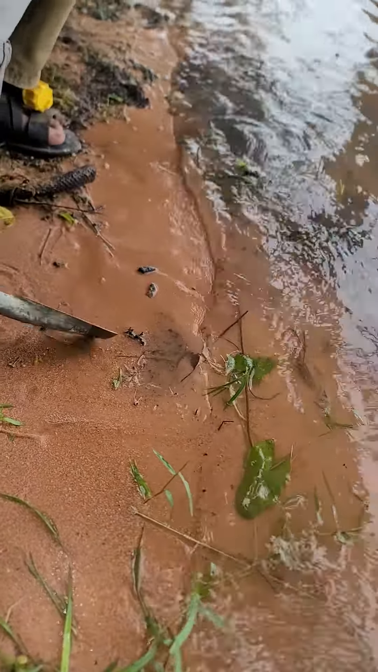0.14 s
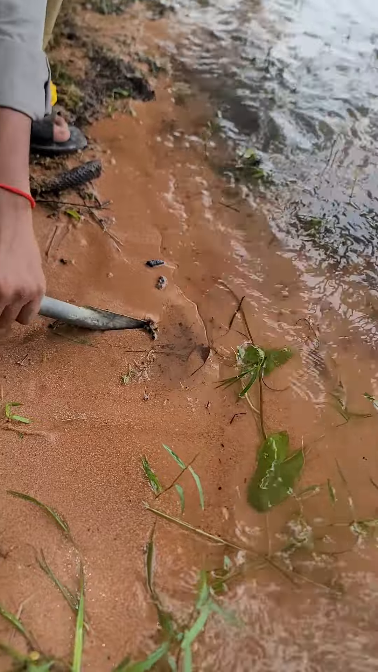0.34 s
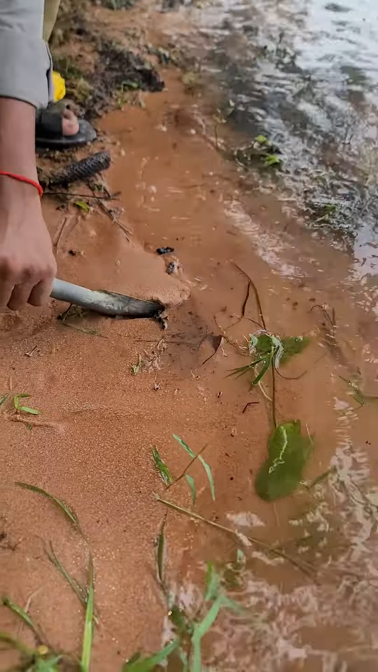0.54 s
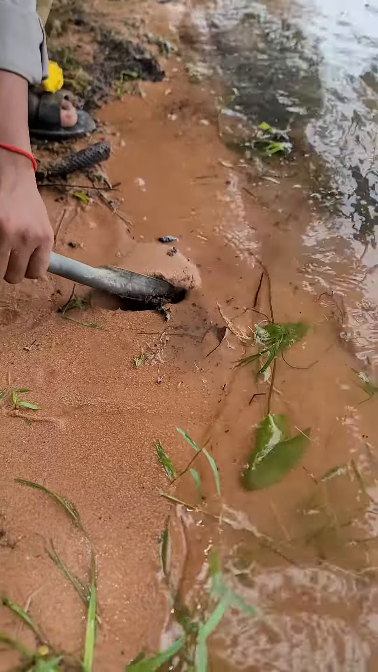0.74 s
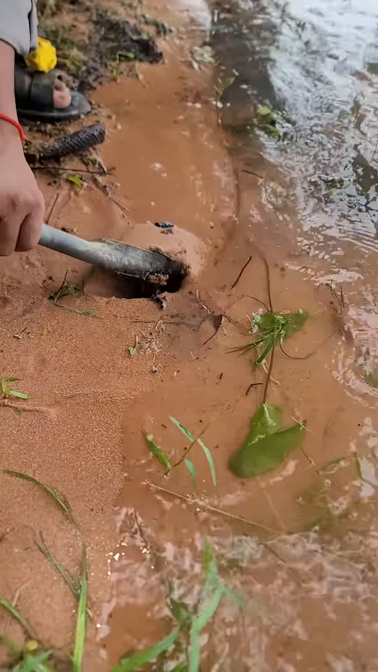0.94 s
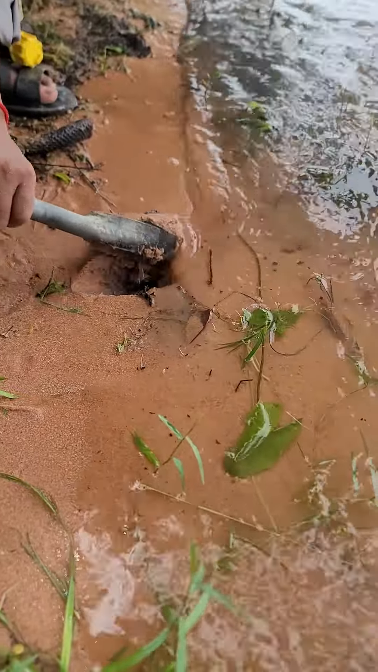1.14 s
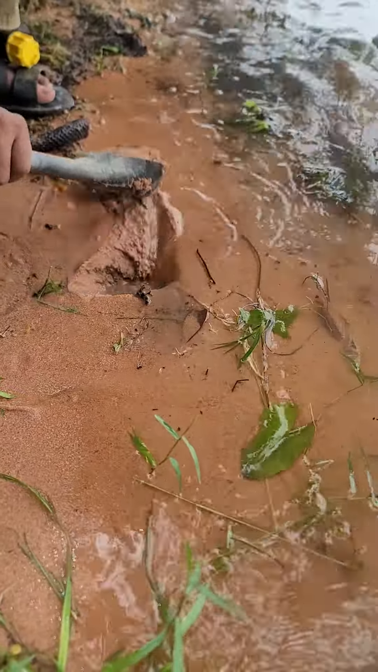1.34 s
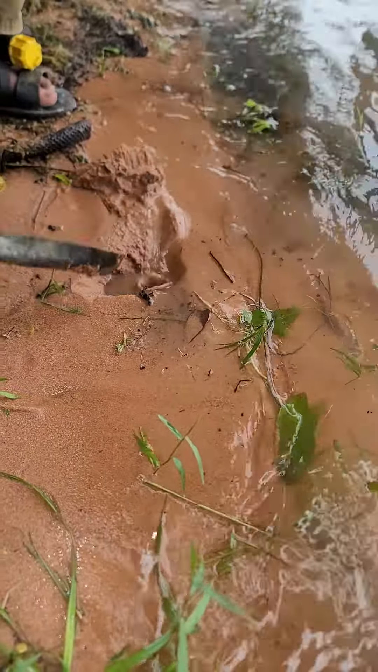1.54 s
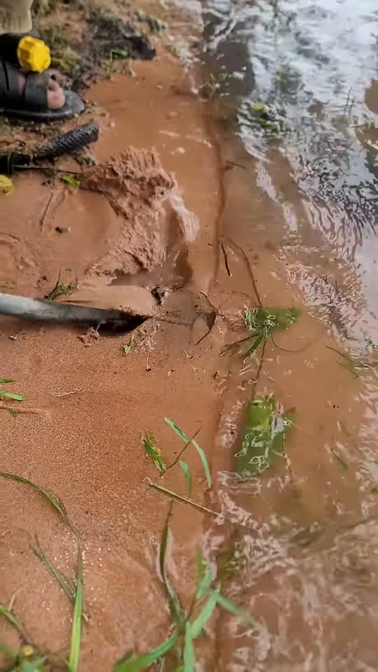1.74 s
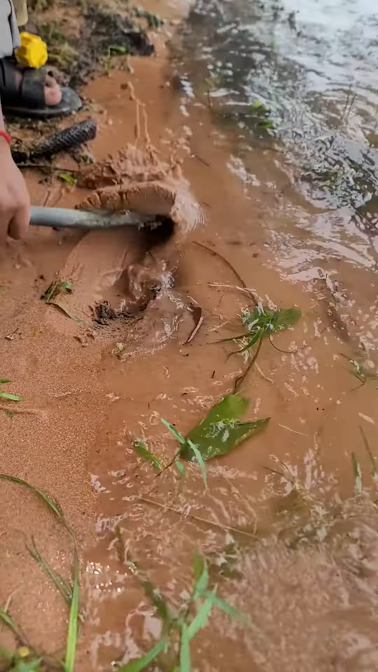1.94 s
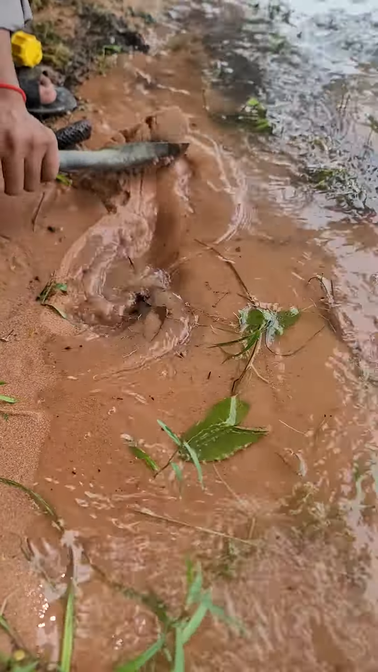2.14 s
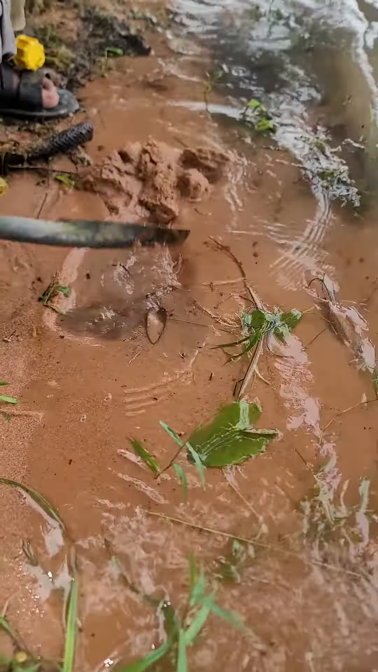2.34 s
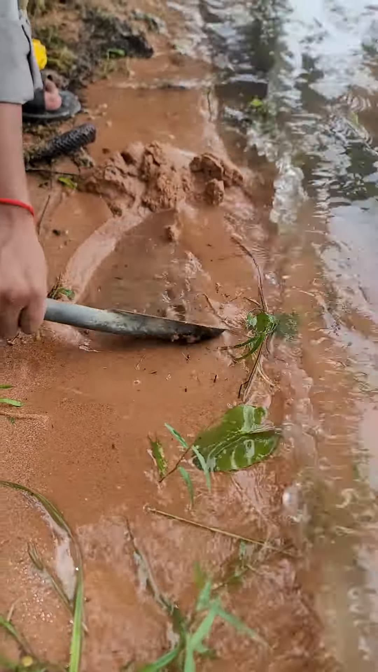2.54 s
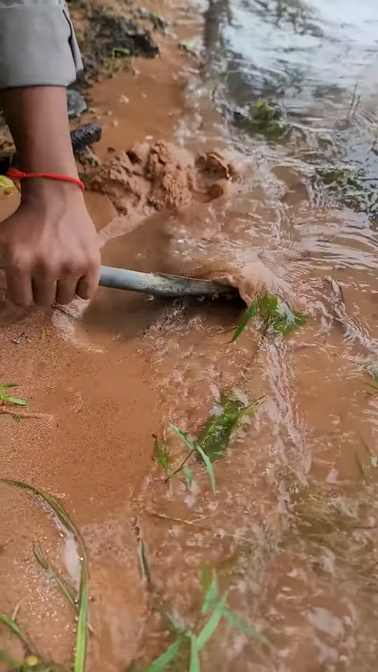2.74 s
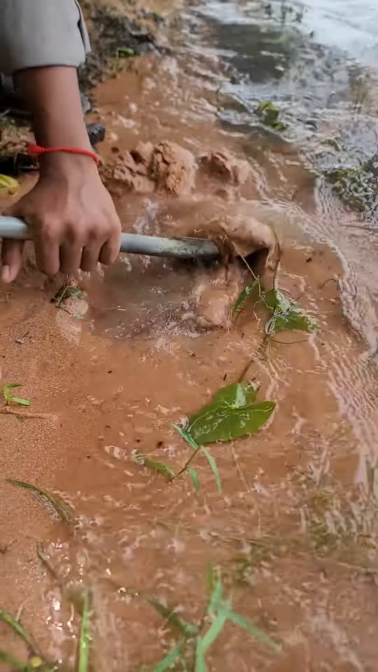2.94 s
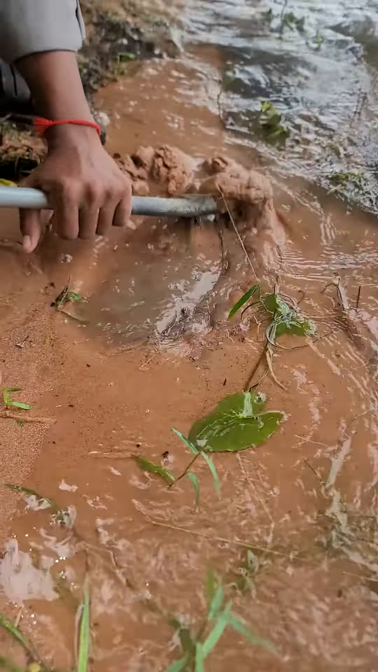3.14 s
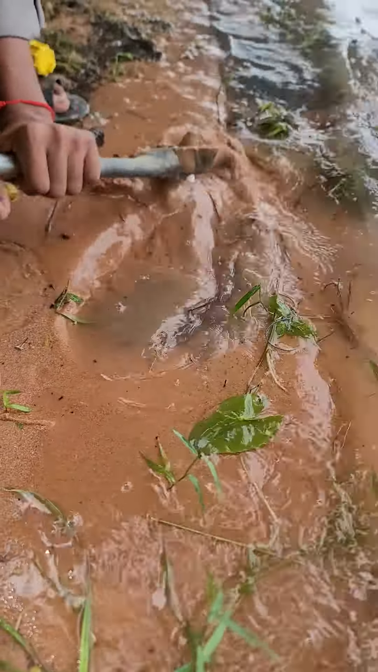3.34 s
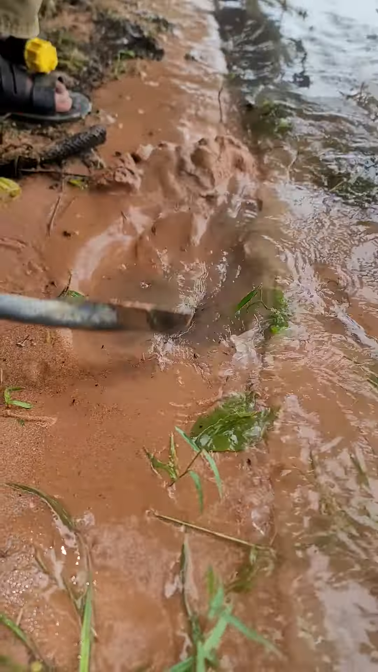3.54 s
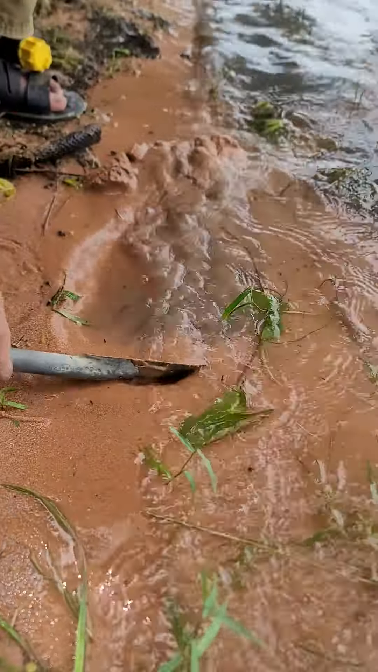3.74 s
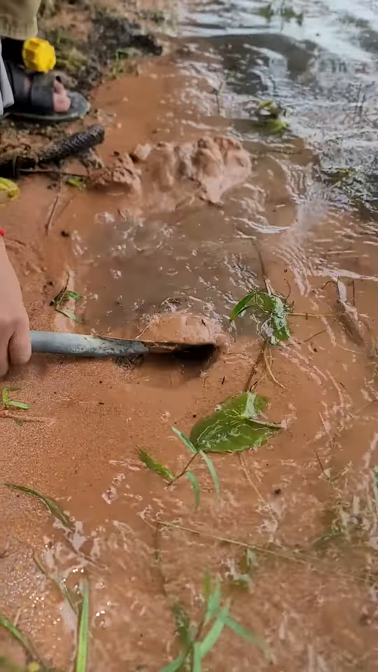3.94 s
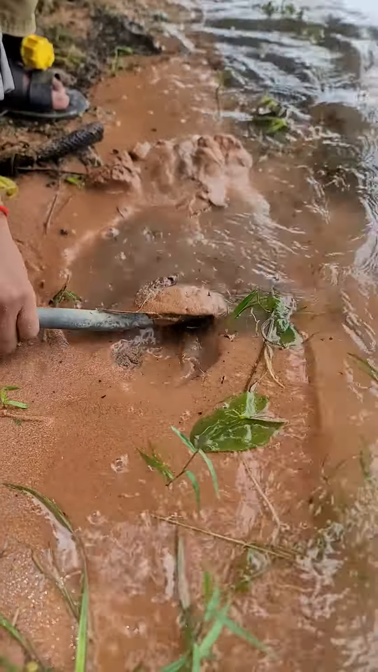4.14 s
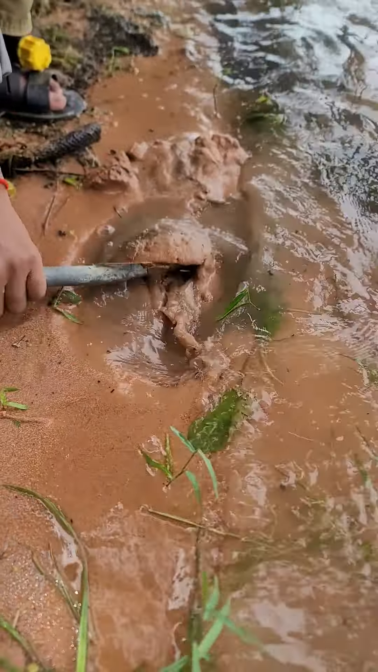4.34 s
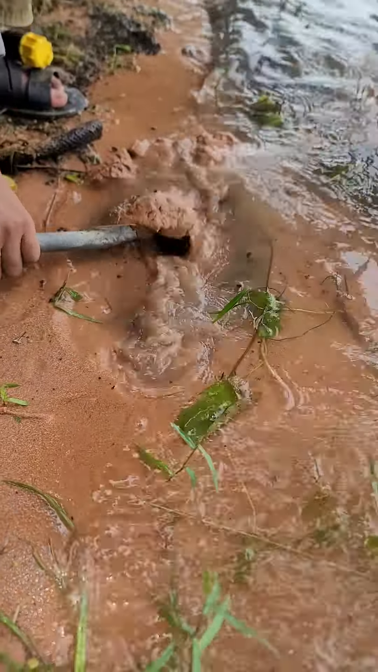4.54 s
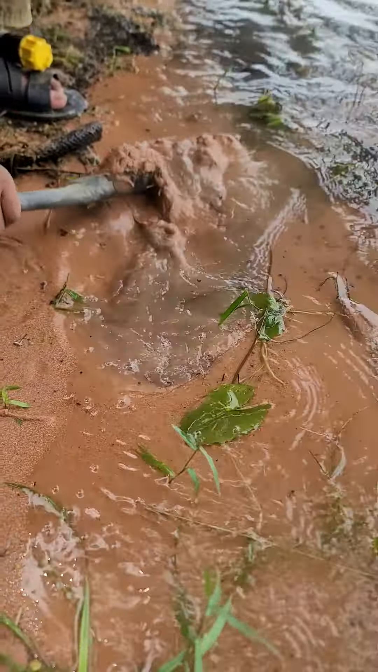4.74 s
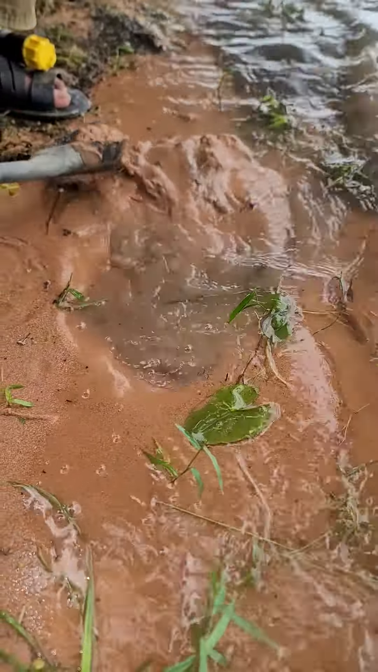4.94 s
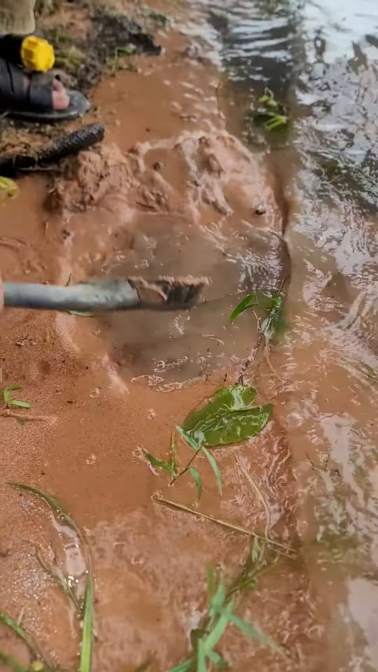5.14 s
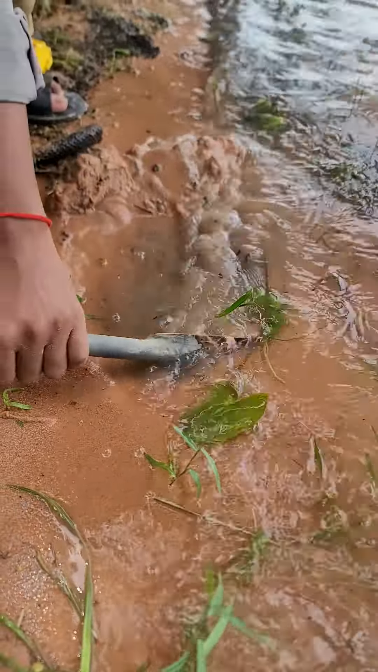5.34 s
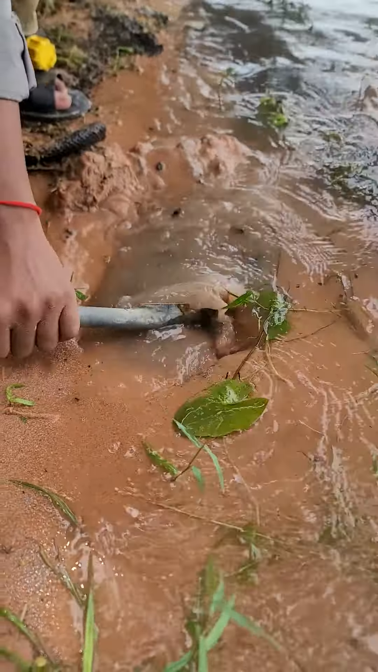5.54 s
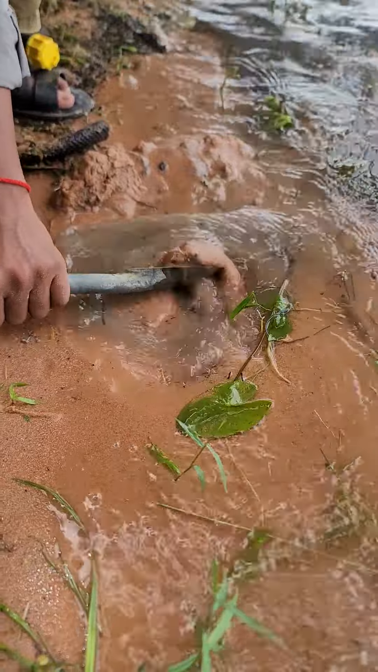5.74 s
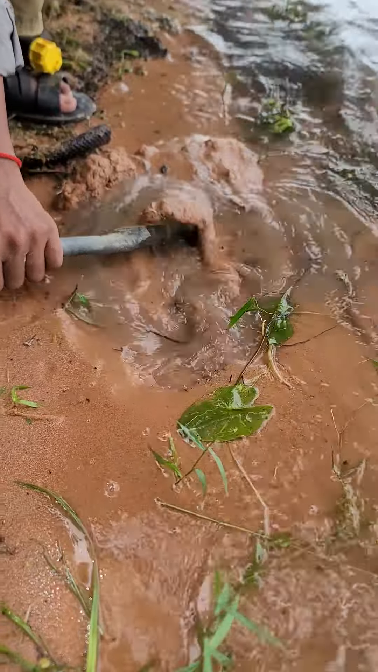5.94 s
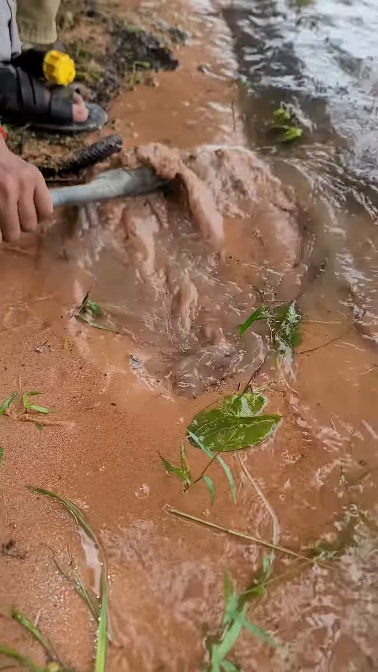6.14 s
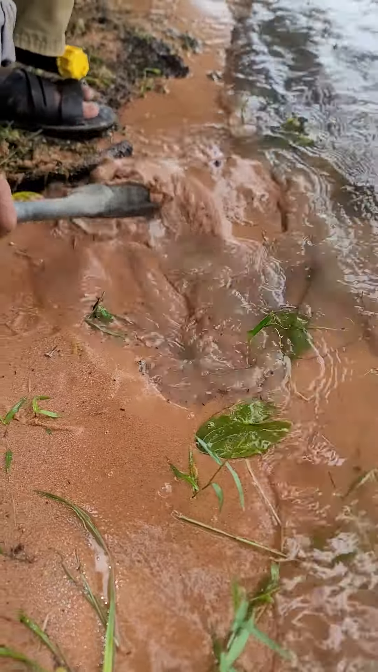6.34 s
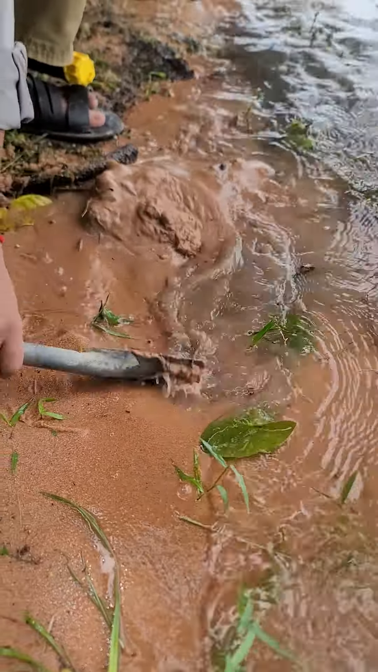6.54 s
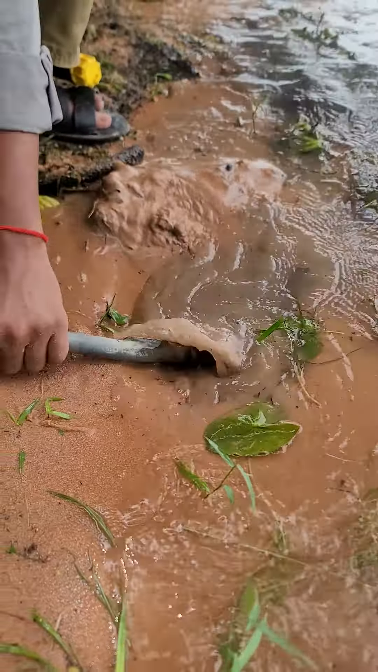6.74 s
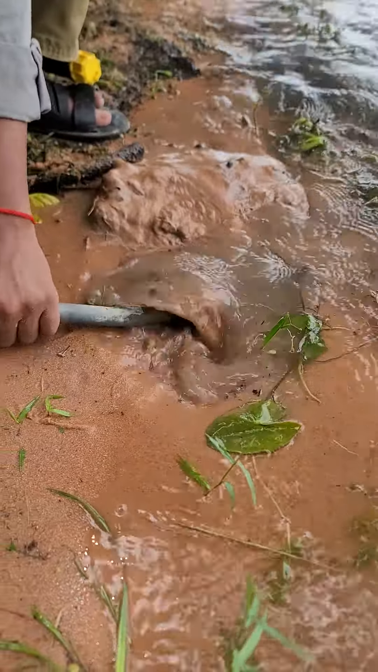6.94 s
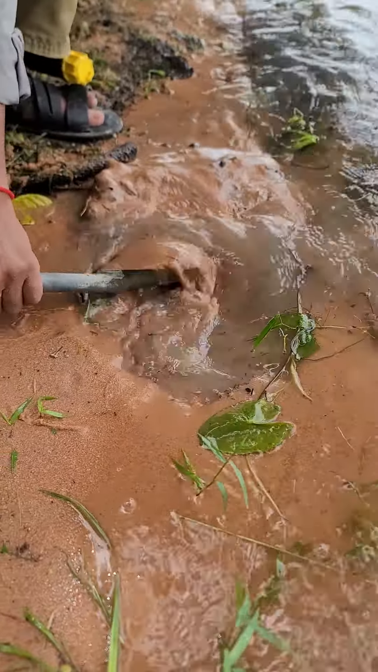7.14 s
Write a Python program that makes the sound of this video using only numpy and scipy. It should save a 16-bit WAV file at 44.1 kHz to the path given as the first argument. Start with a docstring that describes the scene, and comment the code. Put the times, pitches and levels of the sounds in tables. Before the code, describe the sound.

Close stereo, outdoors at a muddy water's edge: a metal pipe pushes through wet sand with gritty, stuttering rasps, soft slops and crackling bubbles. Drops and pebbles tick. A far engine drones under airy hiss, and a distant bird gives short falling whistles early on and again late. The digging is busiest in the middle, eases before five seconds, then resumes to the end.

```python
"""At a muddy water's edge, close to a two-port microphone, a metal pipe is pushed through wet sand.
From the start an engine drones far off, over rumble and open-air hiss, and grains rasp on the steel.
Distant falling whistles of a bird come in the first seconds, among ticking drops and ringing bubbles.
Bubbles and pushes crowd the middle, then ease to a quieter stretch between about 4.5 and 5 s.
The bird, built from gliding sines, returns near 5.5 s; more pushes, bubbles and gurgles close the scene."""
import sys
import numpy as np
from scipy import signal
from scipy.fft import rfft, irfft, next_fast_len
from scipy.io import wavfile
from scipy.ndimage import uniform_filter1d

SR = 44100
rng = np.random.default_rng(int(sys.argv[2]) if len(sys.argv) > 2 else 0)


def to_wav(s):
    """Save 16-bit WAV."""
    ch = np.atleast_2d(s).T  # columns
    pcm = np.round(np.clip(ch, -1, 1) * 32767)  # PCM
    wavfile.write(sys.argv[1], SR, pcm.astype(np.int16))


N = 317079  # samples

# Spectra: frequency_hz, relative level_db per Hz. Each layer is evened to rms 1 afterwards.
# Far rumble below the engine drone
RUMBLE_SPECTRUM = [(15, -60), (30, -21), (45, -13), (65, 9), (90, 1), (140, 1.5), (250, -11.5), (420, -10),
                   (640, -23), (950, -52)]
# Hiss of the open air
AIR_SPECTRUM = [(300, -5), (480, -18), (575, 22.5), (700, 8), (1000, -1), (1550, 17.5), (2300, 3.5),
                (3600, -8.5), (4700, 6.5), (7600, -6.5), (11000, -12), (16500, -16)]
# Sand rasping on steel
RASP_SPECTRUM = [(700, -58), (1200, -27), (1860, -3.5), (2250, -7.5), (3060, 7.5), (4300, 7.5),
                 (5600, -10.5), (7000, -19), (9000, -58)]
# Slurry slopping
SLOP_SPECTRUM = [(150, -59), (350, -12), (600, 3.5), (950, -15), (1400, 6), (2000, -4.5), (3500, -89)]
# Fine bright grit
GRIT_SPECTRUM = [(2000, -10.5), (4000, 6.5), (7100, 5.5), (7700, -10.5), (8500, 1), (12500, -0.5),
                 (16500, -5)]

# Distant engine: order (multiple of the turning rate), mean level_db (rms, before its waver)
ENGINE_ORDERS = [(2, -64), (3, -51.5), (4, -61), (5, -64), (6, -54), (9, -69), (10, -67.5), (15, -70)]
# Distant bird whistles: start_s, length_s, level_db (before waver and echoes), starting pitch_hz
BIRD_WHISTLES = [(0.555, 0.072, -48.5, 1530), (0.764, 0.068, -47, 1530), (0.862, 0.029, -47, 1547),
                 (1.221, 0.031, -43, 1546), (1.273, 0.1, -48, 1582), (5.495, 0.068, -47, 1535),
                 (5.705, 0.031, -44, 1536), (6.158, 0.027, -43, 1524), (6.215, 0.03, -44.5, 1488),
                 (6.26, 0.055, -49, 1525)]
# Specks of spray that land as thin high ticks: start_s, peak level_db
SPRAY_SPECKS = [(0.0912, -41), (0.7277, -32), (0.8265, -39), (1.042, -34), (1.0725, -33), (2.3386, -41),
                (2.38, -47), (3.5354, -33), (4.0607, -34), (5.0065, -45), (5.0534, -45), (5.1614, -48),
                (5.1886, -45)]
# Ticks of drops and pebbles: start_s, level_db (before halving), knock level_db re the snap
DROP_TICKS = [(0.171, -33.5, -16), (0.326, -19.5, -5), (0.772, -29, -18), (1.1407, -26, -19),
              (1.2085, -37, 2), (1.6023, -39, -19), (1.759, -22, -7), (1.985, -35.5, -26),
              (2.4815, -32, -16), (2.996, -38.5, 10.5), (3.487, -27.5, -28), (3.585, -23, -30),
              (3.997, -50, 28), (4.034, -45, 19.5), (4.136, -18, -22), (4.196, -40, 7), (4.23, -32, -3),
              (4.711, -37, -19), (5.4022, -34.5, -1), (5.573, -33, -24), (5.617, -22.5, -26),
              (5.6473, -20, -19), (6.583, -30, 4), (6.619, -21, -7), (6.696, -53, 27), (6.9498, -23.5, -13)]
# Hollows in the mud that open or close: start_s, length_s, level_db (before shake and side), from_hz, to_hz
MUD_GURGLES = [(0.251, 0.073, -41, 2250, 1340), (0.33, .045, -29.5, 1340, 1158),
               (2.52, .075, -38, 611, 694), (2.553, 0.035, -33.5, 936, 970),
               (1.692, 0.055, -31, 2250, 1426), (6.892, .028, -42, 740, 1210),
               (6.913, .036, -37.5, 930, 1003), (6.947, .028, -43, 1326, 1000),
               (7.13, 0.027, -36.5, 2600, 3370), (7.14, 0.021, -38, 890, 1036)]
# Bubbles: start_s, level_db (before wobble), nominal pitch_hz, t60_s, left-minus-right balance_db
BUBBLE_RINGS = [(0.029, -31.5, 1760, 0.03, -4), (0.329, -21, 1460, 0.025, -3),
                (1.14, -35.5, 2770, 0.053, 9), (1.208, -27, 1074, 0.028, 2), (1.533, -41, 1350, 0.043, 1),
                (2.086, -35.5, 2540, 0.039, 5), (2.104, -39.5, 1270, 0.034, 5),
                (2.4, -32, 1810, 0.034, 5.5), (2.453, -24.5, 3130, 0.036, 6), (2.452, -33, 1066, 0.07, 4),
                (2.548, -27, 2510, 0.027, 1), (2.821, -39.5, 970, 0.04, -4), (2.479, -30.5, 2750, 0.036, 5),
                (2.62, -33, 2110, 0.055, 4), (2.507, -37, 945, 0.049, 2), (2.517, -31, 3180, 0.028, 3),
                (2.606, -33, 980, 0.05, 2), (3.208, -35, 1060, 0.028, 6), (3.314, -35.5, 996, 0.042, 11),
                (3.357, -34.5, 5340, 0.026, 8), (3.428, -20, 1780, 0.033, -9),
                (3.444, -30, 3220, 0.011, -3), (3.468, -33, 790, 0.092, 8), (3.521, -33, 776, 0.11, 8.5),
                (3.541, -31, 1380, 0.043, 10.5), (3.595, -23.5, 910, 0.058, 0),
                (3.874, -38, 1443, 0.11, -1), (4.183, -26, 1900, 0.041, -4.5),
                (4.215, -26.5, 1270, 0.029, -7.5), (4.293, -38, 1090, 0.069, -7),
                (4.319, -25.5, 1886, 0.041, 5), (4.342, -38, 1165, 0.031, 8), (4.456, -41, 960, 0.048, 5),
                (5.106, -43, 1410, 0.059, 7), (5.115, -35, 765, 0.091, 7), (5.165, -44, 480, 0.21, 3),
                (5.18, -24.5, 1430, 0.015, -3), (5.216, -20, 1008, 0.031, 2), (5.573, -29, 2630, 0.033, 2),
                (5.616, -23.5, 3100, 0.025, 2), (5.64, -29, 2920, 0.028, -1), (6.529, -22, 2740, 0.018, 2),
                (6.54, -24, 1770, 0.015, -2), (6.624, -21.5, 2810, 0.019, 6),
                (6.584, 4.5, 466, 0.0046, 3.5), (6.603, -27.5, 444, 0.076, 2),
                (6.616, -21.5, 834, 0.022, 10.5), (6.797, -35, 360, 0.13, -2),
                (6.809, -37.5, 3150, 0.02, -8), (6.951, -19, 1160, 0.018, 11.5), (6.985, -34, 620, 0.03, 6),
                (6.986, -33, 2980, 0.019, 5), (7.108, -41, 3310, 0.065, -9.5)]
# Resonances of the pipe: frequency_hz, width_hz (in the rasp), lift_db (in the rasp)
PIPE_MODES = [(1298, 82, 26), (1814, 146, 19.5), (2500, 240, 16.5), (3014, 92, 5.5), (6310, 170, 21.5)]
# Pushes of the pipe: full_force_s, hold_s, force_db, rise_s, fall_s, wetness_db and grittiness_db re the
# force; rise and fall are the times for 20 dB
PIPE_PUSHES = [(0.275, 0.041, -44.5, 0.11, 0.059, -22, -5),
               (0.314, 0.035, -36.5, 0.012, 0.035, -10.5, -13.5),
               (0.783, 0.024, -58.5, 0.26, 0.39, -13, -10), (1.086, 0.06, -51, 0.095, 0.018, -25, -13.5),
               (1.597, 0.0072, -49.5, 0.0077, 0.33, -41, -5.5),
               (1.692, 0.0055, -34, 0.039, 0.079, -17, -9.5), (1.789, 0.077, -45, 0.14, 0.072, -4, -7.5),
               (2.116, 0.0092, -57, 0.18, 0.092, -21, -7), (2.495, 0.092, -44, 0.049, 0.32, -5.5, -9.5),
               (2.716, 0.08, -49, 0.7, 0.38, -5.5, -10), (2.935, 0.11, -60.5, 0.091, 0.26, 1, -0.5),
               (3.324, 0.039, -61.5, 0.33, 0.019, -11, -6), (3.48, 0.0081, -52, 0.095, 0.28, 0.5, -15),
               (3.564, 0.01, -53.5, 0.0066, 0.14, -14, -1), (3.645, 0.034, -39, 0.037, 0.08, -11.5, -9),
               (3.874, 0.13, -50, 0.16, 0.01, -10.5, -15), (4.257, 0.015, -39.5, 0.09, 0.013, -3.5, -20),
               (4.289, 0.044, -51.5, 0.053, 0.15, -4.5, -9), (4.435, 0.13, -66, 0.082, 0.33, 3.5, -3.5),
               (4.868, 0.042, -73.5, 0.024, 0.069, -13, 6), (5.186, 0.1, -47, 0.024, 0.029, -17, -11),
               (5.333, 0.0056, -51.5, 0.014, 0.021, -24, -17.5),
               (5.396, 0.15, -57.5, 0.048, 0.075, -9, -12.5), (5.611, 0.012, -45, 0.022, 0.15, -32, -18),
               (5.801, 0.0081, -49.5, 0.055, 0.097, -5.5, -14),
               (5.865, 0.078, -65.5, 0.057, 0.11, -2.5, -2), (6.219, .01, -50, 0.013, 0.15, -27, -20.5),
               (6.509, 0.1, -42.5, 0.0068, 0.21, -14.5, -15.5), (6.793, 0.2, -57, 0.16, 0.1, 0.5, -18.5),
               (6.956, 0.0027, -41.5, 0.048, 0.0077, -6.5, -14.5),
               (7.141, 0.0045, -54, 0.16, 0.073, 1, -13)]
# Least force while the pipe only drags between pushes: level_db of rasp, slop and grit
DRAG_DB = (-72, -71.5, -81)
# Microphone ports: frequency_hz, lead_rad of the left port
PORT_PHASE = [(0, 0), (190, .25), (350, 1.5), (780, 1.9), (3400, 1.6), (14000, 28), (22050, 44)]
# Microphone colour: frequency_hz, left-minus-right balance_db
PORT_BALANCE = [(60, -0.4), (250, -2), (650, 1), (5000, -0.5), (12000, 2.5)]

ENGINE_HZ = 23.83  # mean turning rate
RUMBLE_DB, AIR_DB = -52, -61  # rms; the air also wavers
RASP_DB, SLOP_DB, GRIT_DB = 3, 1, 14  # gain of each layer on its force
SLIPS_PER_S, SLIP_DB, SLIP_S = 50, 3.2, 0.008  # mean rate, depth, decay constant
RING_DB = 1.0  # ring of the pipe re the snap of a tick
EDGE_HZ = 15900  # upper band limit


def amp(db):
    """Turns decibels into amplitude."""
    return 10 ** (np.asarray(db) / 20)


def evened(x):
    """Scales to rms 1."""
    return x / np.sqrt(np.mean(x ** 2) + 1e-20)


def read(points, hz):
    """Reads a curve between its points on a log frequency scale."""
    f, value = np.transpose(points)
    return np.interp(np.log(hz + 1), np.log(f + 1), value)


def add(mix, s, sound):
    """Lays a sound into the mix at s seconds, cut at the end."""
    part = mix[:, round(s * SR):][:, :sound.shape[1]]
    part += sound[:, :part.shape[1]]


def coloured(x, points, modes=()):
    """Filters by a spectrum with resonance humps; rms 1."""
    size = next_fast_len(N)
    hz = np.fft.rfftfreq(size, 1 / SR)
    humps_db = sum(lift / (1 + (2 * (hz - f) / width) ** 2) for f, width, lift in modes)
    gain = amp(read(points, hz) + humps_db)
    return evened(irfft(rfft(x, size) * gain, size)[..., :N])


def wander(per_s):
    """Random drift of rms 1: low-passed noise drawn 200 times a second."""
    knots = rng.standard_normal(int(N / SR * 200) + 400)
    low_pass = signal.butter(1, np.clip(per_s / 100, .001, .9))
    smooth = signal.filtfilt(*low_pass, knots)[200:-198]  # trims the filter's edges
    return np.interp(np.arange(N) / SR * 200, np.arange(len(smooth)), evened(smooth))


def pair(x, other, same):
    """Two channels that share only part of their sound."""
    same = np.clip(same, 0, 1)
    return np.array([x, same * x + np.sqrt(1 - same ** 2) * other])


def patchy(x, patchy_db):
    """Colour drifts in patches of time and frequency, alike in both channels; rms 1."""
    z = signal.stft(x, nperseg=512)[2]
    field = rng.standard_normal(z.shape[1:])
    field = uniform_filter1d(field, size=3, axis=0)  # across frequency
    field = uniform_filter1d(field, size=7, axis=1)  # across time
    return evened(signal.istft(z * amp(patchy_db * evened(field)), nperseg=512)[1][:, :N])


def engine():
    """Far engine: sine orders of one unsteady turning rate, each wavering in level."""
    turns = ENGINE_HZ * np.cumsum(1 + 0.00377 * wander(per_s=1.37)) / SR
    drone = np.zeros(N)
    for order, db in ENGINE_ORDERS:
        level = amp(db + 1.8 * wander(per_s=1.5))
        tone = np.sin(2 * np.pi * (order * turns + rng.random()))
        drone += level * np.sqrt(2) * tone
    return drone


def rumble():
    """Far rumble: low noise, mostly alike at both ports."""
    noise = pair(*rng.standard_normal((2, N)), 0.86)
    return amp(RUMBLE_DB) * coloured(noise, RUMBLE_SPECTRUM)


def open_air():
    """Wide hiss of the open air: noise whose colour and level drift."""
    noise = pair(*rng.standard_normal((2, N)), .35)
    air = patchy(coloured(noise, AIR_SPECTRUM), 2.5)
    return amp(AIR_DB + 4.4 * wander(per_s=2.9)) * air


def bird():
    """Distant short whistles that hold and then drop, smeared by echoes from the trees."""
    out = np.zeros((1, N))
    for s, length, db, hz in BIRD_WHISTLES:
        done = np.linspace(0, 1, round(length * SR))
        waver = evened(uniform_filter1d(rng.standard_normal(len(done)), size=600))
        pitch = hz * (1 - 0.088 * done ** 2.5 + waver / 60)
        tone = np.sin(2 * np.pi * np.cumsum(pitch) / SR) * amp(2.5 * waver)
        add(out, s, amp(db) * tone[None] * np.sqrt(np.sin(np.pi * done).clip(0)))
    fade = amp(-60 * np.arange(6000) / SR / .18)  # 60 dB in 0.18 s
    echoes = rng.standard_normal((2, 6000)) * fade
    echoes = echoes / np.linalg.norm(echoes[0])
    return out + amp(-6.0) * signal.oaconvolve(out, echoes, axes=1)[:, :N]


def spray():
    """Each speck lands close by as a very short burst of differenced, hence bright, noise."""
    out, t = np.zeros((2, N)), np.arange(400) / SR
    for s, db in SPRAY_SPECKS:
        noise = rng.standard_normal((2, len(t)))
        burst = np.diff(pair(*noise, 0.41), prepend=0) * amp(-60 * t / 0.015)
        add(out, s, amp(db) * burst / abs(burst).max())
    return out


def ticks():
    """A drop or pebble makes a noise burst: bright snap, dull knock and a ring in the pipe's modes."""
    out, t = np.zeros((2, N)), np.arange(1200) / SR
    hz, width = np.transpose(PIPE_MODES)[:2, :, None]
    bright = signal.butter(2, [1500, 5500], "band", fs=SR)
    dull = signal.butter(1, [400, 1800], "band", fs=SR)
    mode_rings = np.sin(2 * np.pi * hz * t) * np.exp(-np.pi * (width + 90) * t)  # damped by 90 Hz more
    for s, db, knock_db in DROP_TICKS:
        t60 = .01 + .014 * rng.random()
        noise = rng.standard_normal((2, len(t)))
        burst = pair(*noise, .4) * amp(-60 * t / t60) * np.minimum(t / .0006, 1)
        modes = np.square(rng.random(len(PIPE_MODES))) @ mode_rings
        ring = signal.fftconvolve(burst, modes[None])[:, :len(t)]
        snap = signal.lfilter(*bright, burst)
        knock = signal.lfilter(*dull, burst)
        snap, ring, knock = (part / abs(part).max() for part in (snap, ring, knock))
        add(out, s, amp(db) * (snap + amp(RING_DB) * ring + amp(knock_db) * knock) / 2)
    return out


def gurgles():
    """A shaky ring that glides as a hollow in the mud changes size."""
    out = np.zeros((2, N))
    for s, length, db, from_hz, to_hz in MUD_GURGLES:
        done = np.linspace(0, 1, round(length * SR))
        re, im = uniform_filter1d(rng.standard_normal((2, len(done))), size=260)
        shake = 1 + .45 * (evened(re) + 1j * evened(im))  # unsteady level and phase
        glide = np.cumsum(from_hz + (to_hz - from_hz) * done) / SR
        ring = (shake * np.exp(2j * np.pi * glide)).imag
        ring = ring * np.sqrt(np.sin(np.pi * done).clip(0))
        add(out, s, np.outer(amp([db + 0.5, db - 3.0]), ring))
    return out


def bubble(hz, t60):
    """An air pocket swells in, rings and climbs in pitch as it nears the surface."""
    t = np.arange(0, np.clip(t60, .003, .15), 1 / SR)
    swell = np.minimum(t * hz / 2.2, 1)  # over 2.2 cycles of the nominal pitch
    return np.sin(2 * np.pi * (0.966 * hz * t + 1300 * t ** 2)) * amp(-60 * (t / t60) ** 0.98) * swell


def bubbles():
    """The close bubbles that stand out; the mud shakes each ring unevenly."""
    out = np.zeros((2, N))
    for s, db, hz, t60, balance_db in BUBBLE_RINGS:
        sides = amp([db + balance_db / 2, db - balance_db / 2])
        add(out, s, np.outer(sides, bubble(hz, t60)))
    return out * amp(4 * np.array([wander(per_s=90), wander(per_s=80)]))


def swarm(high, low, low_hz, span, cycles, db, range_db, count):
    """Many short rings of chance pitch, size and side; high ones follow one force, all follow another."""
    u, pitch, size, side, ring = rng.random((count, 5)).T
    at = (u * N).astype(int)
    hz = low_hz * span ** pitch
    level = (pitch * high[at] + low[at]) * amp(db + range_db * size ** 4)  # few are large
    ears = level * amp(4.1 * np.outer([1, -1], side - .5))
    out = np.zeros((2, N))
    for k in np.flatnonzero(level > 1e-4):  # skips the faintest
        t60 = (.5 + ring[k]) * cycles / hz[k]
        add(out, at[k] / SR, ears[:, k, None] * bubble(hz[k], t60))
    return out


def grains(per_s, spread_db, hiss, same):
    """Sand grains slip as clicks of very unlike sizes over a hiss, each from its own side."""
    size = amp(spread_db * np.minimum(rng.exponential(1, N), 3))
    signed = size * rng.choice([-1., 1.], N)
    clicks = evened(signed * (rng.random(N) < per_s / SR))
    side = amp(np.outer([1, -1], 10.2 * np.tanh(rng.standard_normal(N))))
    return clicks * side + hiss * pair(*rng.standard_normal((2, N)), same)


def effort():
    """Each push rises, holds and falls; gives the forces of rasp, slop and grit."""
    t = np.arange(N) / SR
    levels = np.outer(amp(DRAG_DB), np.ones(N))
    for s, hold, db, rise, fall, wet_db, grit_db in PIPE_PUSHES:
        away = np.maximum((s - t) / rise, (t - s - hold) / fall)
        force = amp(db - 20 * np.maximum(away, 0))
        levels = np.maximum(levels, np.outer(amp([0, wet_db, grit_db]), force))  # the strongest push wins
    return levels


def slips():
    """Sudden slips in dB around a zero mean: quick up, slower down."""
    kicks = rng.exponential(1, N).clip(0, 3) * (rng.random(N) < SLIPS_PER_S / SR)
    jumps = signal.lfilter([1], [1, -np.exp(-1 / (SLIP_S * SR))], kicks)
    jumps = np.tanh(uniform_filter1d(jumps, size=40))
    return SLIP_DB * (jumps - jumps.mean())


def digging():
    """Pushes drive rasp, slop and grit, stuttering by stick and slip; shifting sand drifts the colour."""
    stroke, wet, dry = effort() * amp(slips())
    rasp = patchy(coloured(grains(900, 4.5, hiss=.8, same=.6), RASP_SPECTRUM, PIPE_MODES), 4.2)
    slop = patchy(coloured(grains(500, 3.0, hiss=.9, same=.4), SLOP_SPECTRUM), 4)
    grit = patchy(coloured(grains(3000, 3.5, hiss=1.6, same=.3), GRIT_SPECTRUM), 2.5)
    grit = grit * amp(1.6 * wander(per_s=90))
    # small bubbles
    fizz = swarm(stroke, wet, low_hz=700, span=4.5, cycles=30, db=-3, range_db=21, count=5000)
    # wet clumps cracking
    crunch = swarm(stroke, stroke, low_hz=1400, span=2.8, cycles=22, db=-3, range_db=22, count=3500)
    friction = amp(RASP_DB) * stroke * rasp + amp(SLOP_DB) * wet * slop + amp(GRIT_DB) * dry * grit
    return friction + fizz + crunch


def scene():
    """Far sounds first, then the water's edge, then the pipe close by."""
    far = engine() + rumble() + open_air() + bird()
    edge = spray() + ticks() + gurgles() + bubbles()
    return far + edge + digging()


def record(dry):
    """The two ports hear the scene with a phase offset and their own colour; then the band limit."""
    size = next_fast_len(N + 4096)
    hz = np.fft.rfftfreq(size, 1 / SR)
    lead = np.interp(hz, *np.transpose(PORT_PHASE))
    left = amp(read(PORT_BALANCE, hz) / 2) * np.exp(.5j * lead)
    heard = irfft(rfft(dry, size) * np.array([left, 1 / left]), size)[:, :N]
    low_pass = signal.firwin(401, EDGE_HZ, window=("kaiser", 9), fs=SR)
    return signal.oaconvolve(heard, low_pass[None], "same")


dry = scene()
out = record(dry)
to_wav(out)
```